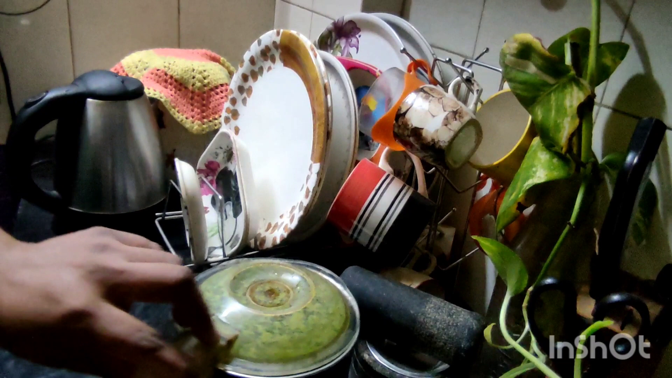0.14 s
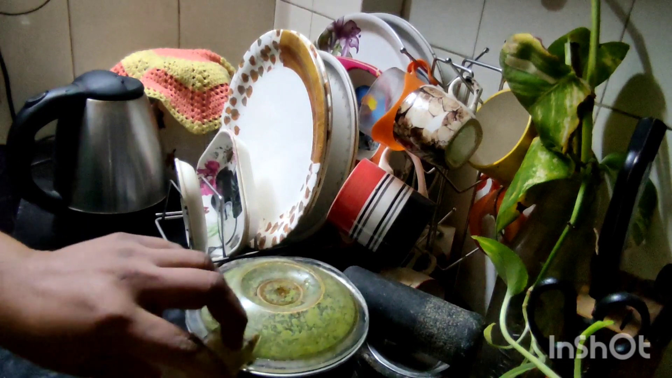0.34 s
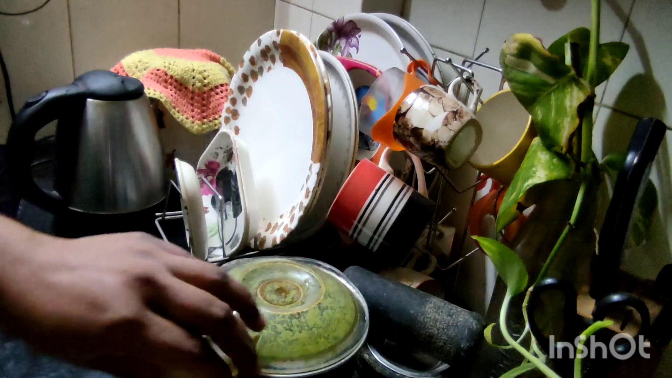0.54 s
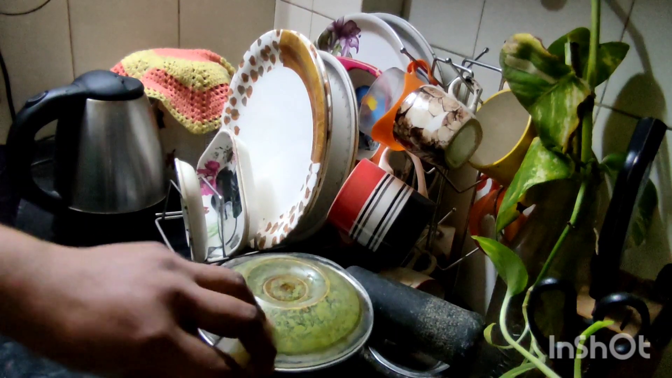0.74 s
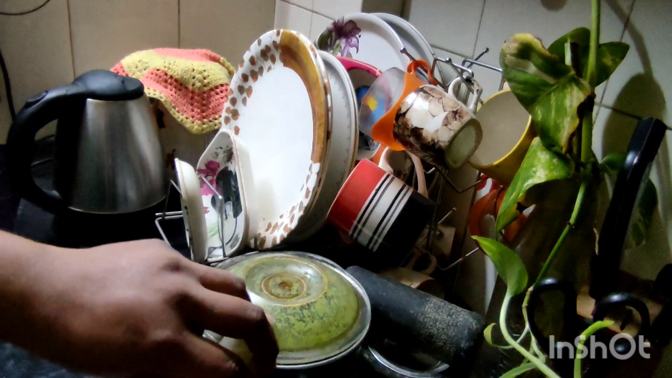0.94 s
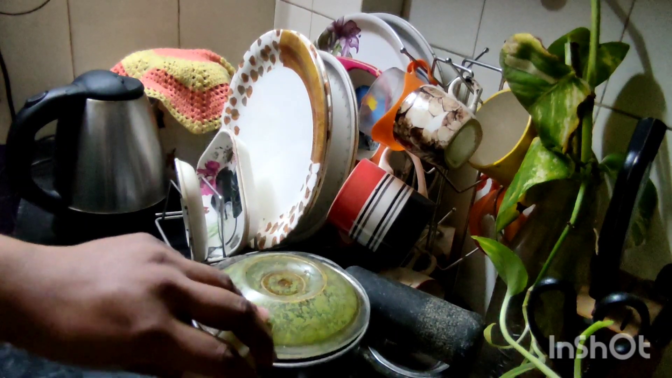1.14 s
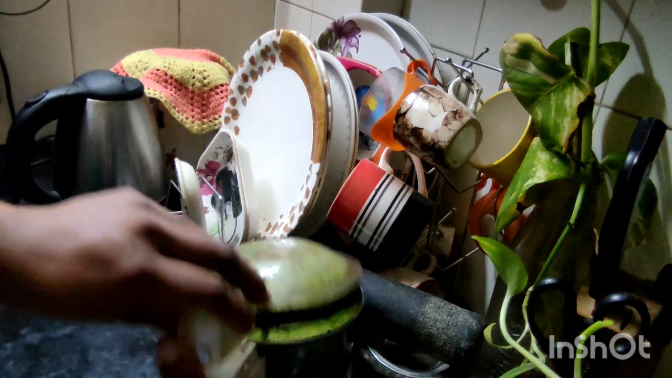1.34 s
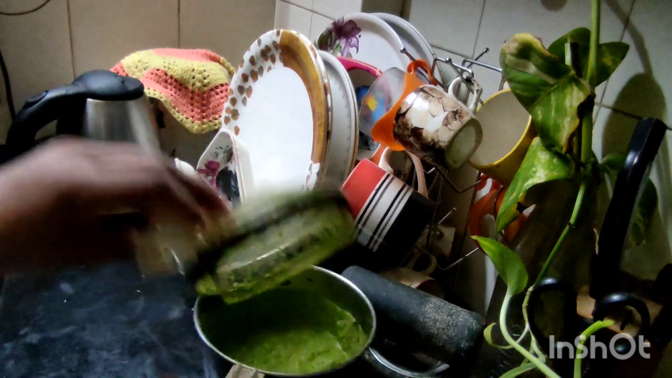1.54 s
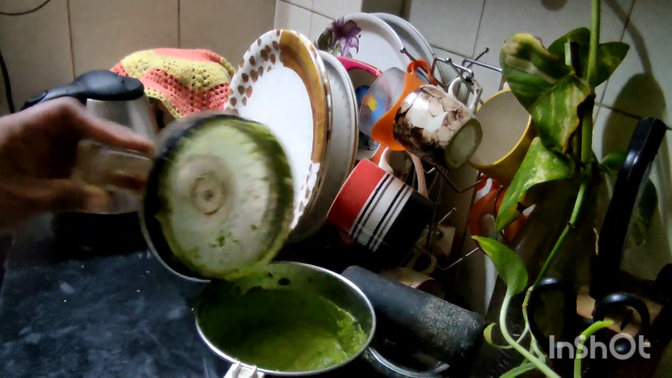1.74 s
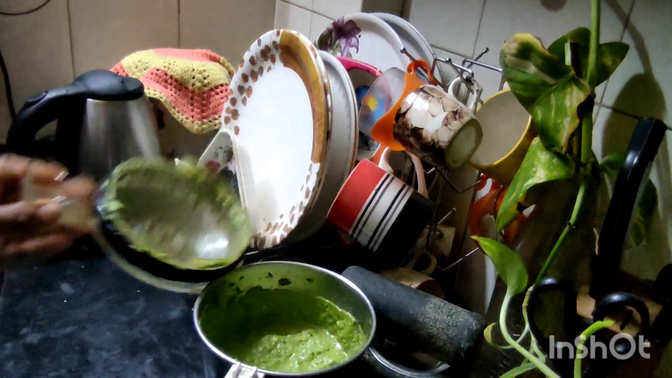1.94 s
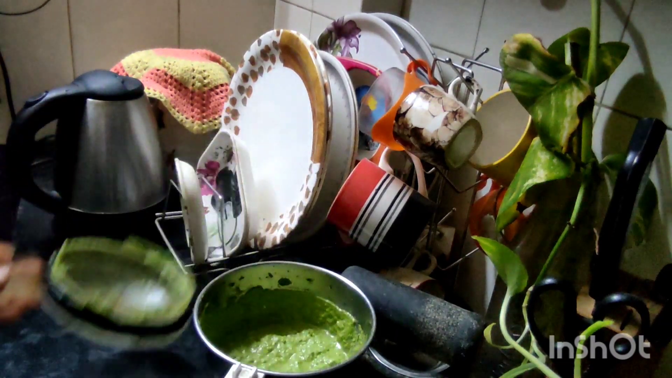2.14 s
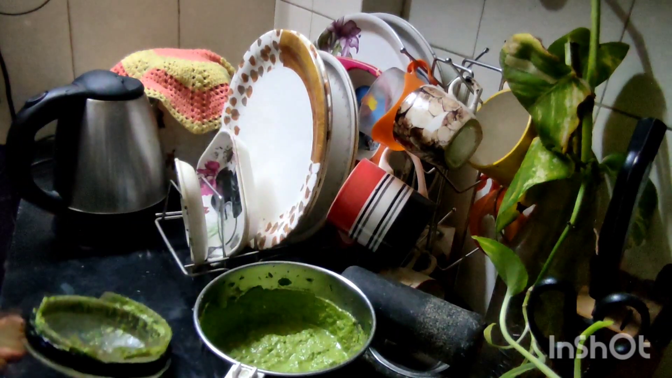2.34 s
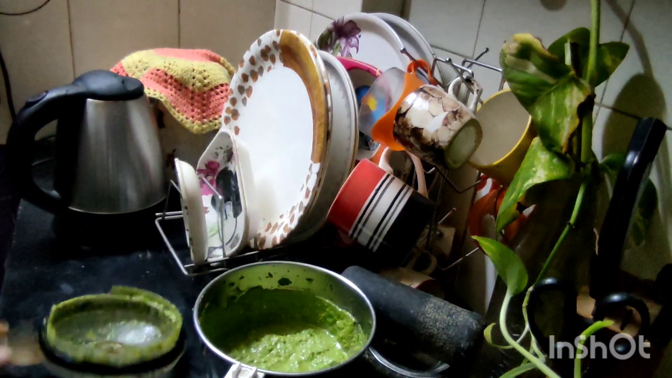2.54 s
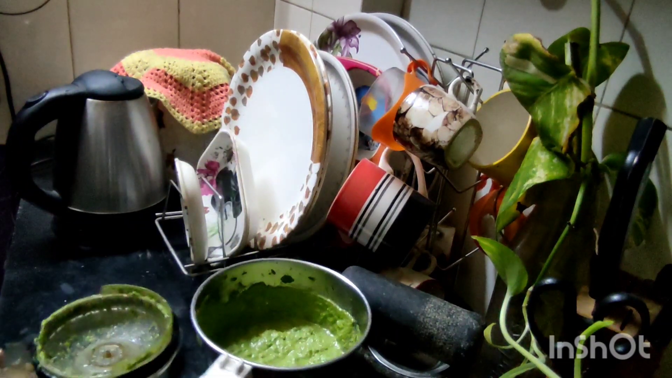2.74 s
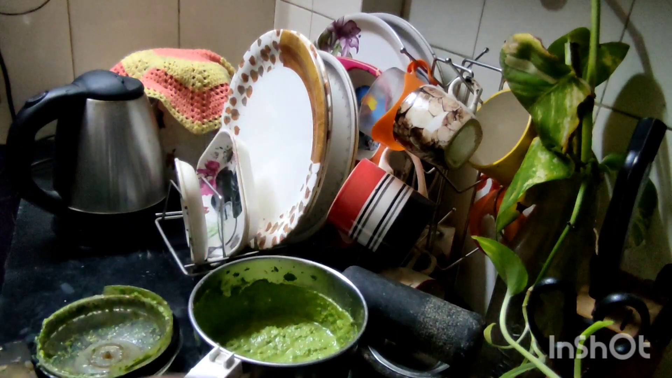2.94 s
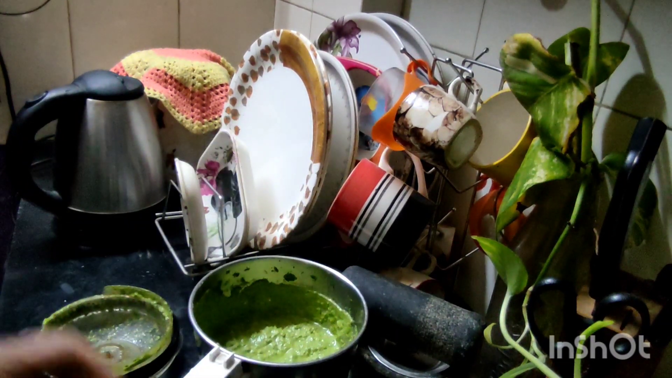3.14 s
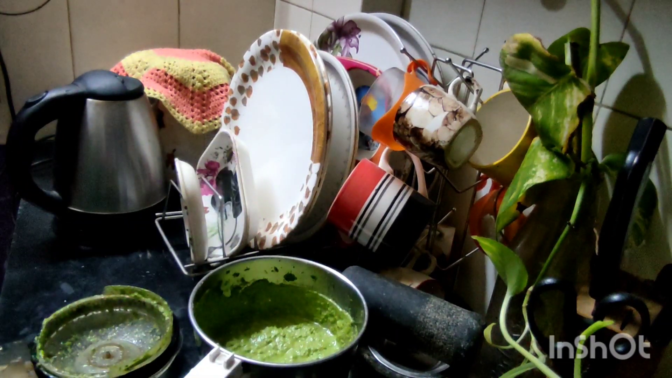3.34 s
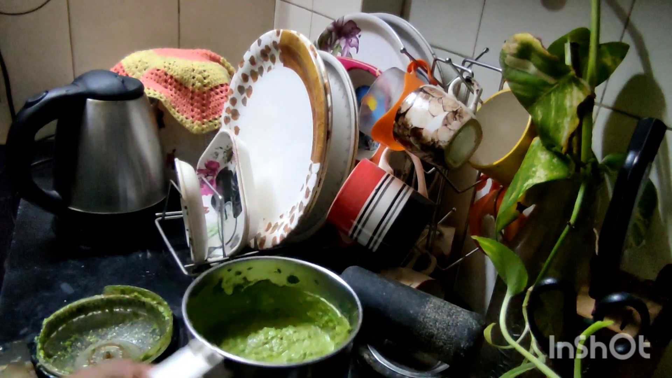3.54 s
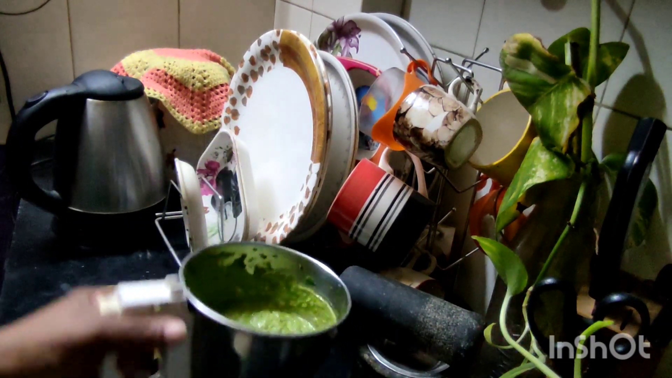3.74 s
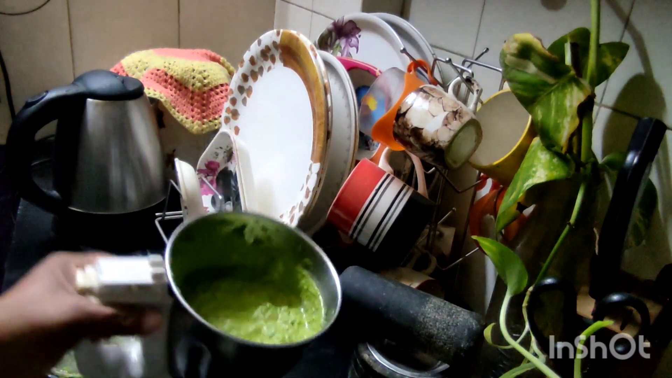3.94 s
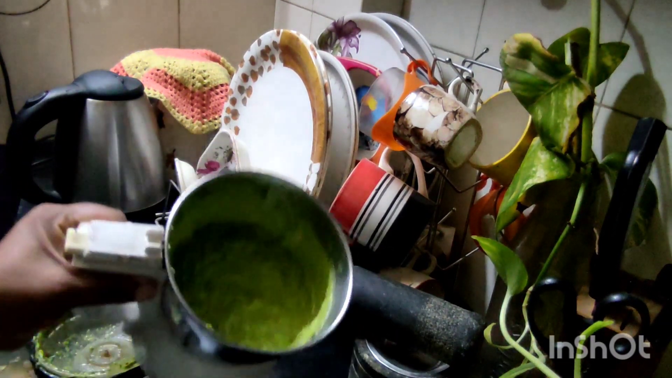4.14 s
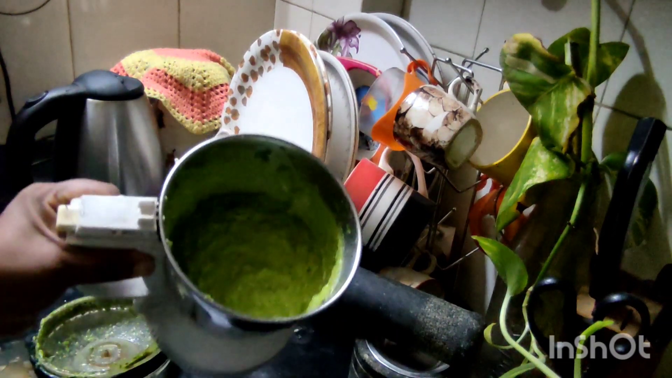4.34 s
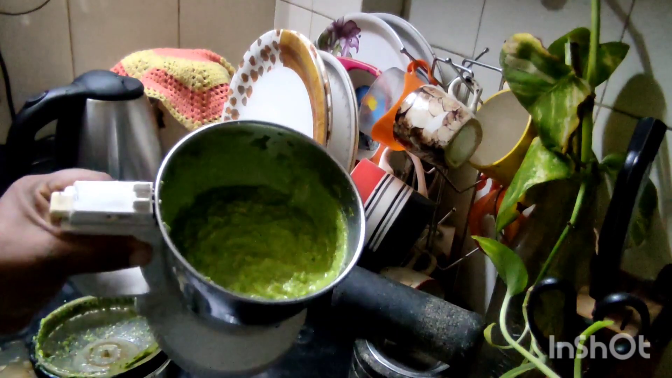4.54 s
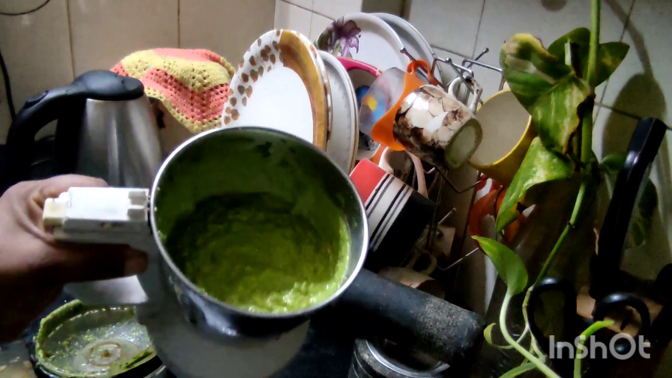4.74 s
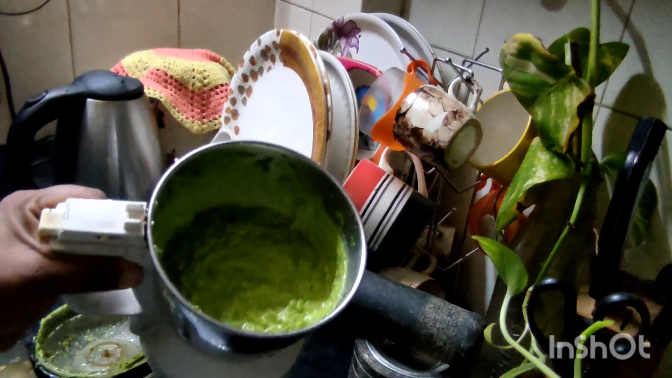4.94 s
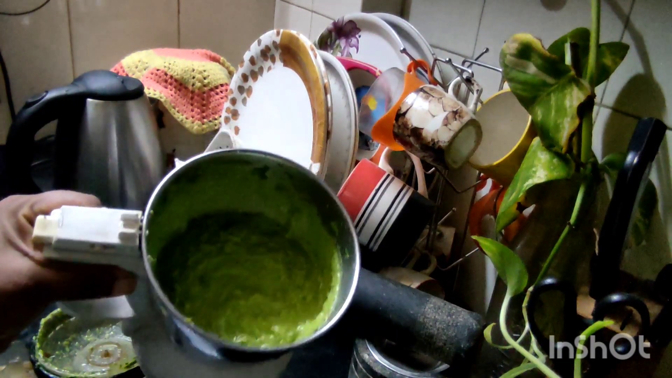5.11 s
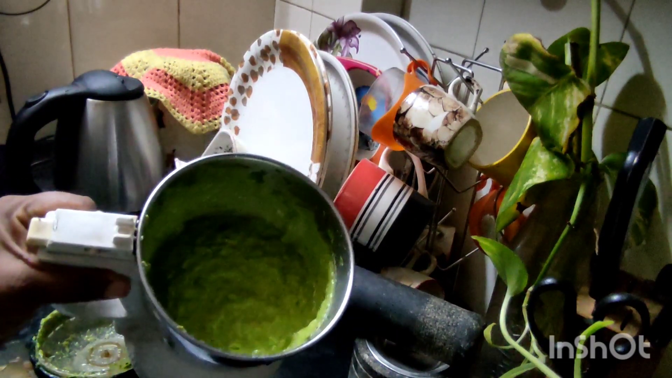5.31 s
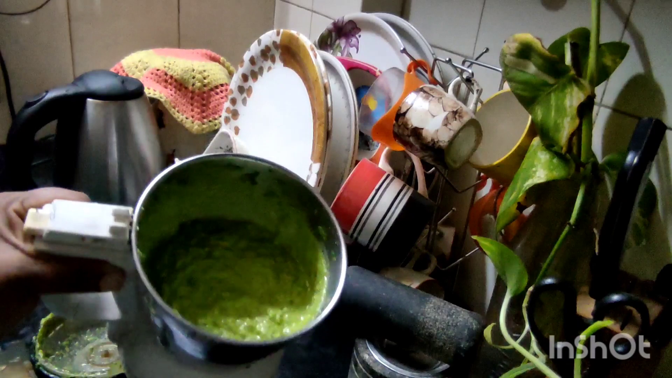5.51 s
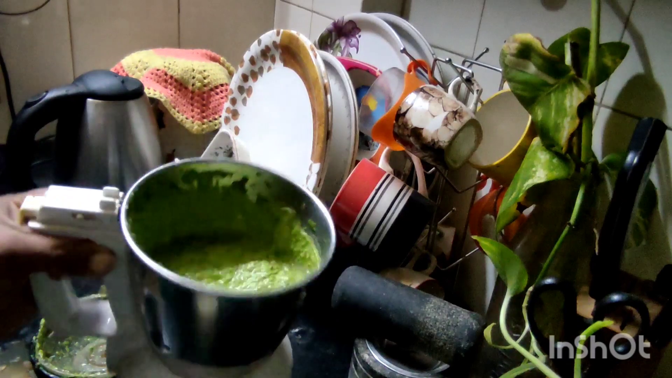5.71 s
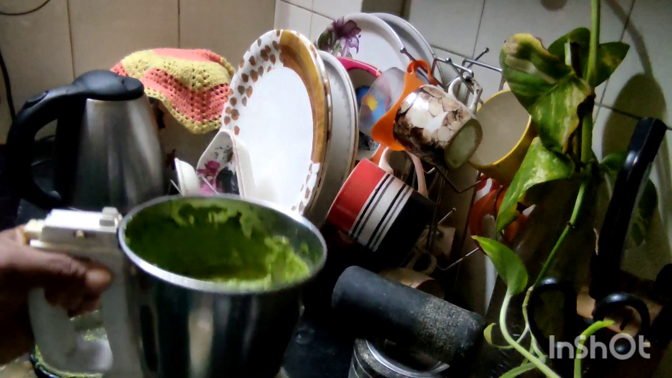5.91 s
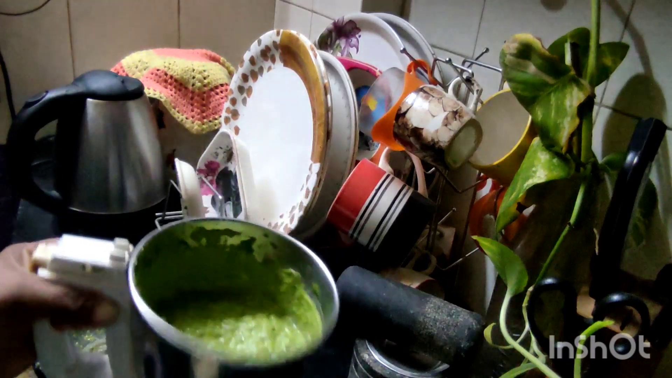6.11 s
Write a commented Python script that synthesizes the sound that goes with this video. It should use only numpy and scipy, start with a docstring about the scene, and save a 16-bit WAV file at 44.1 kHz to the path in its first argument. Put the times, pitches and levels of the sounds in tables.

```python
"""A steel grinder jar is handled close by on a counter in a small tiled kitchen.
First fingers bump and rub the lid: decaying low modes with dull taps, and grainy filtered noise.
At 1.4 s it pops off: a noise snap, a ringing wall, a low thump. It ticks in the hand and is set down,
then the jar is lifted with a clink: noise cracks and ringing steel modes, with dense kitchen echo.
Throughout lies a low rumble of swelling noise, joined by faint hollow tones of narrow-band noise."""
import sys
import numpy as np
from scipy import signal
from scipy.fft import rfft, irfft
from scipy.io import wavfile
from scipy.ndimage import uniform_filter1d

SR = 44100
rng = np.random.default_rng(int(sys.argv[2]) if len(sys.argv) > 2 else 0)


def waveform_to_disk(signal):
    """Save audio, clipped to [-1, 1], as 16-bit WAV at the path in sys.argv[1]."""
    frames = np.transpose(np.atleast_2d(signal))
    scaled = np.clip(frames, -1, 1) * 32767
    samples = np.round(scaled).astype(np.int16)
    wavfile.write(sys.argv[1], SR, samples)


N = 272097
HIT_T_S = np.arange(SR // 2) / SR

# Blows on the loose lid. Each row: start in seconds, level in dB (3 dB is taken off in the mix),
# ring over crack in dB, left over right of the ring in dB, treble tilt in dB per octave (doubled for the ring).
LID_HITS = [(1.730, -45.5, 3, -7.5, -8), (1.867, -48.5, 0.5, -2, -5), (2.230, -30.5, -1, 18, -2)]
# Steel meeting steel or stone. Each row: as for the lid blows.
CLINKS = [(0.1706, -44, -12, 0, -1), (0.277, -56, -14, 0, 1), (0.842, -51, -14, 0, -3),
          (2.6096, -41, -9, 0, -1), (2.7232, -34, 0, -2, -.3), (2.7508, -33, 0, -1, .7),
          (2.754, -30.5, 3.5, -1, -.5), (2.782, -41, 0, 0, 0), (3.7854, -48.5, -8, 0, 1),
          (3.8458, -32.5, 2.5, 1, -1.5)]
# Dull bumps of the hand on the jar. Each row: start in seconds, level in dB, pitch in Hz,
# fingertip tap relative to the rocking in dB.
BUMPS = [(0.100, -41.5, 102.3, -12), (0.113, -31.5, 94.4, -37), (0.17, -33.5, 105.2, -15),
         (0.22, -40, 109, -2), (0.2553, -40, 135, 0), (0.276, -36, 96.3, -32), (0.839, -41, 196, -7),
         (1.089, -38.5, 121, -12), (1.177, -38, 185, -2.5), (1.288, -55, 184, 7), (3.373, -48.5, 220, -2),
         (3.546, -49, 203, -26)]
# The lid leaving the rim. One row: thump in dB, snap in dB, wall ring in dB.
POP_LEVELS_DB = (-11, -22, -43)
# Strokes of skin or steel sliding. Each row: start in seconds, length in seconds, peak body in dB, peak hiss in dB.
STROKES = [(-.1, 0.48, -58, -58.5), (0.417, 0.41, -53.5, -56), (1.057, 0.23, -45.5, -51.5),
           (1.225, 0.46, -59.5, -70), (1.379, 0.058, -41, -52), (2.274, 0.34, -59, -63),
           (2.493, 0.32, -52, -58.5), (2.75, 0.82, -68, -78), (3.344, .11, -56.5, -59.5),
           (3.376, .37, -45.5, -49), (3.652, 0.14, -66.5, -73), (3.75, 0.21, -56.5, -65),
           (4.506, 0.27, -98, -73.5), (5.49, 0.22, -87, -77.5)]
# Faint hollow tones. Each row: centre in seconds, length in seconds, pitch in Hz, width in Hz, level in dB.
TONES = [(1.005, 0.27, 1210, 173, -58), (0.954, 0.21, 7030, 350, -73.5), (2.394, 0.47, 1248, 162, -58),
         (2.42, 0.21, 2175, 200, -58), (3.046, 0.42, 1040, 150, -65.5), (3.77, 0.29, 1180, 170, -58.5),
         (4.247, 0.67, 1065, 119, -68), (4.785, .18, 1154, 99, -65.5), (4.901, 0.42, 1550, 278, -63.5),
         (5.05, .52, 1157, 149, -61), (5.218, 0.36, 7080, 380, -76), (5.473, 0.48, 1455, 350, -68),
         (5.828, 0.4, 1085, 78, -63)]

# Modes of the lid, the struck steel, the jar with its air, and the bright jar wall.
# Each row: frequency in Hz, relative level in dB, time to fall 60 dB in seconds.
LID_MODES = [(610, -27, 0.16), (1260, 6.5, 0.12), (1294, -15, 0.38), (1803, -21, 0.21), (3290, -10, 0.11),
             (3250, -20, .25), (3750, -24, 0.22), (4371, -11, .2), (4700, -19, 0.32), (6800, -12, 0.24),
             (7235, -6, 0.22), (7650, -11, .2)]
STEEL_MODES = [(110, -20, .25), (560, -21, .15), (1372, 0, .16), (1408, 3.5, .22), (2073, -8, .13),
               (2345, -2, .2), (2643, -11, .16), (3305, -6, .17), (3445, -3, .17), (3950, -6, .15),
               (4230, -8, .18), (7122, -18, .25)]
JAR_MODES = [(98.8, -4.5, 0.27), (140.6, -7, 0.23), (186.7, -3, 0.2), (204, 4, 0.097), (241, -1, 0.098),
             (307, -11.5, 0.37), (396.3, -14, 0.17), (423.5, -14, 0.26), (455, -28.5, 0.3), (547, -18, 0.2),
             (693, -23, 0.33), (900, -28, 0.17), (967, -28, 0.39)]
WALL_MODES = [(1555, -3, .22), (1609, -3, .26), (1926, 0, .09), (2325, -7, .2), (2640, -4, .2),
              (3366, -8, .2)]

# Spectra of the contacts, the rubbing and the room. Each row: frequency in Hz, relative level in dB.
LID_CRACK_COLOUR = [(100, 1), (400, -11.5), (800, 2), (1500, -5), (2600, -2), (3400, 7.5), (5200, 1),
                    (7100, 5.5), (8700, -1), (9800, -10), (12500, -5.5), (14300, -3)]
CLINK_CRACK_COLOUR = [(100, -1.5), (220, -8), (520, -5), (800, -5.5), (1050, -3.5), (1500, 1.5), (2400, 0),
                      (3000, -2), (3700, 0), (4400, -6), (5100, -8), (7200, -6.5), (8600, -18.5),
                      (9800, -28), (14000, -34)]
SNAP_COLOUR = [(100, -16.5), (350, 5), (650, 2.5), (1000, 3.5), (1300, -5.5), (1600, 3), (1950, 2),
               (2300, -1), (2700, -1.5), (3500, -8), (5500, -10), (7300, -15), (9000, -36.5), (14000, -41)]
TAP_COLOUR = [(100, 10.5), (250, -0.5), (560, -1), (750, -6.5), (1000, -6), (2000, -31), (6000, -50),
              (14000, -63)]
RUB_COLOUR = [(80, -1), (250, 3.5), (450, -5.5), (900, 2.5), (1400, 2), (2400, 2.5), (3500, -6),
              (5000, -6.5), (7200, -2), (8800, -13), (10000, -16), (13000, -13), (14300, -19)]
FLOOR_COLOUR = [(12, -20.5), (22, 1.5), (43, -18), (72, -15.5), (100, -14.5), (135, -24.5), (175, -21),
                (230, -32.5), (305, -27.5), (450, -34.5), (800, -38.5), (1200, -35.5), (2400, -44),
                (7000, -53.5), (9500, -61), (14000, -53.5)]
# Resonances of the hollow rubbing. Each row: frequency in Hz, width in Hz, peak in dB.
RUB_PEAKS = [(1730, 140, 10), (2920, 350, 9), (5080, 440, 5.5)]

# Likeness of diffuse noise at the two ports. Each row: frequency in Hz, left-right correlation.
LIKENESS = [(30, 0.82), (100, 1), (250, 0.7), (450, 0.34), (800, 0.08), (1400, -0.22), (3000, 0.099),
            (14000, -0.13)]
# Kitchen echo. Each row: frequency in Hz, time to fall 60 dB in seconds.
ROOM_T60 = [(100, 0.64), (300, 0.39), (800, 0.4), (2000, 0.32), (5000, 0.35), (9000, 0.29), (14000, 0.36)]
# Colour difference of the microphone ports. Each row: frequency in Hz, left over right in dB.
PORTS = [(100, -1), (1000, 0.5), (4000, -1.5), (6000, -4), (7300, -1.5), (8000, -4), (8700, 14), (9500, 0),
         (14000, -2)]


def amp(db):
    """Decibels to gain."""
    return 10 ** (np.asarray(db) / 20)


def evened(x):
    """Scales to rms 1."""
    return x / np.sqrt(np.mean(x ** 2) + 1e-20)


def struck(x):
    """Scales a blow so that its first 10 ms have rms 1."""
    return x / np.sqrt(np.mean(x[..., :SR // 100] ** 2) + 1e-20)


def read(points, hz):
    """Interpolates a table along a log-frequency axis."""
    table_hz, value = np.transpose(points)
    return np.interp(np.log(hz + 1), np.log(table_hz + 1), value)


def add(mix, start_s, sound):
    """Mixes a stereo sound in at start_s, or at 0 if that is negative."""
    part = mix[:, max(round(start_s * SR), 0):][:, :sound.shape[1]]
    part += sound[:, :part.shape[1]]


def filtered(x, kind, order, cutoff_hz):
    """Causal Butterworth filter."""
    return signal.sosfilt(signal.butter(order, cutoff_hz, kind, fs=SR, output="sos"), x)


def coloured(x, gain_db, size=8192):
    """Minimum-phase filter whose gain in dB is a function of frequency in Hz."""
    hz = abs(np.fft.fftfreq(size, 1 / SR))
    log_gain = np.log(amp(gain_db(hz)) + 1e-5)
    spectrum = np.exp(signal.hilbert(log_gain).conj())
    taps = np.fft.ifft(spectrum).real[:size // 2]
    return signal.oaconvolve(x, taps if x.ndim == 1 else taps[None], axes=-1)[..., :x.shape[-1]]


def noise(size):
    """Diffuse noise at two ports: alike in the bass, nearly unrelated in the treble."""
    a, b = rfft(rng.standard_normal((2, size)))
    same = np.clip(read(LIKENESS, np.fft.rfftfreq(size, 1 / SR)), -1, 1)
    return irfft([a, same * a + np.sqrt(1 - same ** 2) * b], size)


def rise(rise_s):
    """Exponential onset of a blow."""
    return 1 - np.exp(-HIT_T_S / rise_s)


def ring(modes, lag_s):
    """Sum of exponentially dying modes; the right port trails the left by lag_s."""
    t_s = np.maximum(HIT_T_S - np.array([[0], [lag_s]]), 0)
    return struck(sum(amp(db - 60 * t_s / t60_s) * np.sin(2 * np.pi * hz * t_s) for hz, db, t60_s in modes))


def crack(colour, t60_s, tilt_db=0):
    """The crowd of short-lived modes that a contact wakes, as decaying coloured noise."""
    burst = noise(len(HIT_T_S)) * amp(-60 * HIT_T_S / t60_s)
    # the tilt pivots at 2 kHz and is flat below 400 Hz
    return struck(coloured(burst, lambda hz: read(colour, hz) + tilt_db * np.log2(np.maximum(hz, 400) / 2000)))


def kitchen(x, wet_db, build_s=0.0013):
    """Adds the dense echo of tiles and crockery, each band dying at its own speed."""
    hz, t_s, bands = signal.stft(noise(len(HIT_T_S)), SR, nperseg=256)
    dying = bands * amp(-60 * t_s / read(ROOM_T60, hz)[:, None])
    tail = signal.istft(dying, SR, nperseg=256)[1][:, :len(HIT_T_S)] * rise(build_s) ** 2
    polarity = np.sign(np.sum(x[0] * x[1]))  # keeps opposed channels from cancelling
    source = (x[:1] + x[1:] * polarity) / np.sqrt(2)
    echo = signal.fftconvolve(source, tail / np.linalg.norm(tail[0]), axes=1)
    return x + amp(wet_db) * echo[:, :x.shape[1]]


def room_floor(level_db=-54, corner_hz=160, lift_db=1.5, swell_db=2.9, swell_step_s=0.287):
    """A rumble that swells and sinks at random under a thin, even hiss; level_db precedes the swells."""
    lead = SR // 2  # lets the filter settle
    floor = coloured(noise(N + lead), lambda hz: read(FLOOR_COLOUR, hz))[:, lead:]
    floor = amp(level_db) * evened(floor)
    low = signal.sosfiltfilt(signal.butter(2, corner_hz, fs=SR, output="sos"), floor)
    turns = rng.standard_normal(size=64)
    swell = np.interp(np.arange(N) / SR / swell_step_s, np.arange(len(turns)), turns)
    return floor - low + low * amp(lift_db + swell_db * swell)


def hollow_tones(overtone_ratio=1.95, overtone_db_per_khz=-12.5):
    """Narrow-band noises that swell and fade, each with one overtone, the weaker the higher the tone."""
    out = np.zeros((2, N))

    def band(size, centre_hz, width_hz, ratio):
        """Noise through one resonance, its centre and width stretched by ratio."""
        return evened(coloured(
            noise(size), lambda hz: -20 * np.log10(1 + (2 * (hz / ratio - centre_hz) / width_hz) ** 2)))

    for centre_s, length_s, centre_hz, width_hz, db in TONES:
        size = int(length_s * SR)
        tone = band(size, centre_hz, width_hz, 1)
        overtone = band(size, centre_hz, width_hz, overtone_ratio)
        overtone_db = overtone_db_per_khz * centre_hz / 1000
        swell = signal.windows.tukey(size, 0.9)
        add(out, centre_s - length_s / 2, amp(db) * (tone + amp(overtone_db) * overtone) * swell)
    return out


def stroke_gains(skew=0.75, point=2.07):
    """Each stroke is one arch of sliding speed, rising faster than it falls, driving body and hiss."""
    t_s, power = np.arange(N) / SR, np.zeros((2, N))
    for start_s, length_s, body_db, hiss_db in STROKES:
        progress = np.clip((t_s - start_s) / length_s, 0, 1)
        speed = abs(np.sin(np.pi * progress ** skew)) ** point
        power += (amp([[body_db], [hiss_db]]) * speed) ** 2
    return np.sqrt(power + 1e-20)


def rubbing(grain_db=1.5, echo_gain=0.3, echo_s=0.001046, split_hz=4000, hollow_from_db=-58, hollow_over_db=10.5):
    """Fine friction grains; firmer strokes go hollow by resonances and one short echo off a near surface."""
    body_gain, hiss_gain = stroke_gains()
    hollow = np.clip((20 * np.log10(body_gain) - hollow_from_db) / hollow_over_db, 0, 1)
    flicker = evened(uniform_filter1d(rng.standard_normal(N), size=130))
    plain = coloured(noise(N) * amp(grain_db * flicker), lambda hz: read(RUB_COLOUR, hz))

    def hollow_db(hz):
        """Comb of the echo, which weakens above 5.5 kHz, plus the resonances."""
        echo = echo_gain / (1 + (hz / 5500) ** 4) * np.exp(2j * np.pi * hz * echo_s)
        peaks_db = sum(db / (1 + (2 * (hz - peak_hz) / width_hz) ** 2) for peak_hz, width_hz, db in RUB_PEAKS)
        return 20 * np.log10(abs(1 + echo)) + peaks_db

    tuned = coloured(plain, hollow_db)
    rub = (1 - hollow) * evened(plain) + hollow * evened(tuned)
    body = evened(filtered(rub, "low", 4, split_hz))
    hiss = evened(filtered(rub, "high", 4, split_hz))
    return body * body_gain + hiss * hiss_gain


def bumps(rock_cycles=24.7):
    """Soft pushes rock the jar on its foot, 60 dB down after rock_cycles; a fingertip adds a dull tap."""
    out = np.zeros((2, N))
    for start_s, db, hz, tap_db in BUMPS:
        t60_s = rock_cycles / hz
        rock = ring([(hz, 0, t60_s), (hz * 1.4, -12, t60_s / 2)], lag_s=0.0001) * rise(0.0015)
        tap = kitchen(crack(TAP_COLOUR, t60_s=0.035), wet_db=-1)
        add(out, start_s, amp(db) * (rock + amp(tap_db) * tap))
    return out


def blows(rows, modes, colour, crack_t60_s, crack_wet_db, ring_wet_db):
    """Each blow cracks, then leaves the object ringing; each row's tilt makes both duller or brighter."""
    out = np.zeros((2, N))
    for start_s, db, ring_db, pan_db, tilt_db in rows:
        contact = kitchen(crack(colour, crack_t60_s, tilt_db), crack_wet_db)
        woken = [(hz, mode_db + 2 * tilt_db * np.log2(hz / 2000), t60_s) for hz, mode_db, t60_s in modes]
        pan = amp([[pan_db / 2], [-pan_db / 2]])
        tone = kitchen(ring(woken, lag_s=0.00023) * rise(0.0005) * pan, ring_wet_db)
        add(out, start_s, amp(db) * (contact + amp(ring_db) * tone) / np.sqrt(2))
    return out


def lid_pop(start_s=1.3956, thump_delay_s=0.002, thump_cut_hz=78):
    """The seal lets go with a snap, the wall rings, and the jar and the air in it thump."""
    thump_db, snap_db, wall_db = POP_LEVELS_DB
    out = np.zeros((2, N))
    snap = kitchen(crack(SNAP_COLOUR, t60_s=0.029), wet_db=-5.5, build_s=0.0021)
    wall = kitchen(ring(WALL_MODES, lag_s=0.0001), wet_db=-16)
    # negative lag: the right port leads
    thump = kitchen(ring(JAR_MODES, lag_s=-0.00034) * rise(0.0025), wet_db=-15.5)
    thump = filtered(thump, "high", 3, thump_cut_hz)
    add(out, start_s, amp(snap_db) * snap + amp(wall_db) * wall)
    add(out, start_s + thump_delay_s, amp(thump_db) * thump)
    return out


def scene():
    """Room, hand, jar and lid together."""
    background = room_floor() + hollow_tones()
    hand = rubbing() + bumps()
    steel = blows(CLINKS, STEEL_MODES, CLINK_CRACK_COLOUR, crack_t60_s=0.045, crack_wet_db=-2, ring_wet_db=-9.5)
    lid = blows(LID_HITS, LID_MODES, LID_CRACK_COLOUR, crack_t60_s=0.08, crack_wet_db=-3, ring_wet_db=-5.5)
    return background + hand + steel + lid + lid_pop()


def record(dry, edge_hz=14330):
    """Each microphone port has its own colour; a steep low-pass then limits the band."""
    left = coloured(dry[0], lambda hz: read(PORTS, hz) / 2)
    right = coloured(dry[1], lambda hz: -read(PORTS, hz) / 2)
    band_limit = signal.firwin(511, edge_hz, window=("kaiser", 9), fs=SR)
    return signal.oaconvolve(np.array([left, right]), band_limit[None], "same")


dry = scene()
out = record(dry)
waveform_to_disk(out)
```